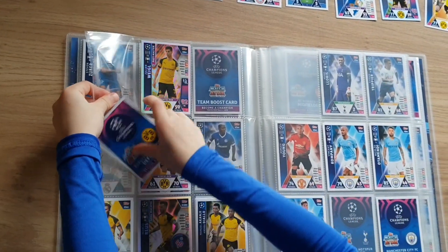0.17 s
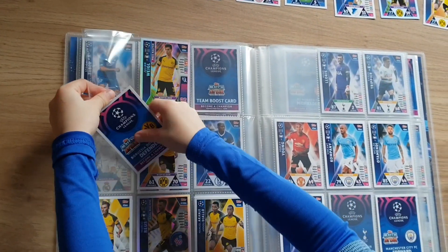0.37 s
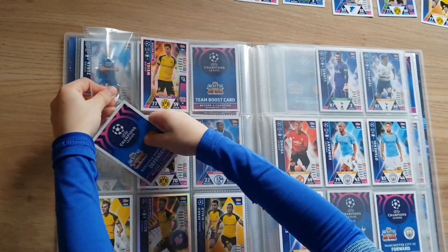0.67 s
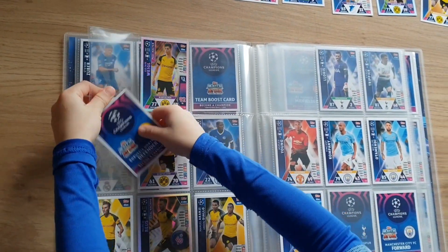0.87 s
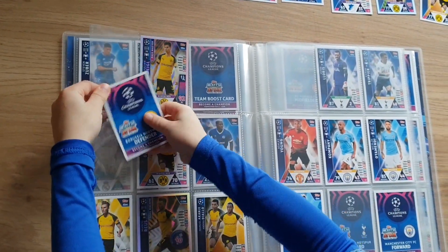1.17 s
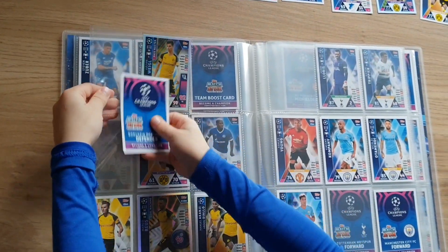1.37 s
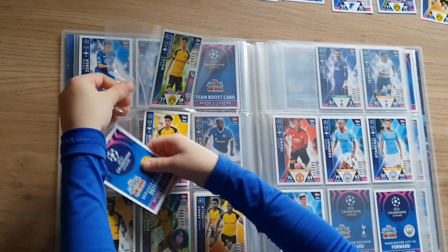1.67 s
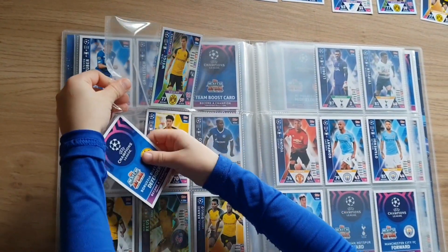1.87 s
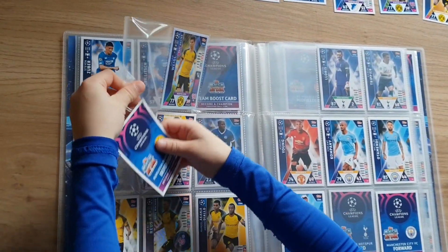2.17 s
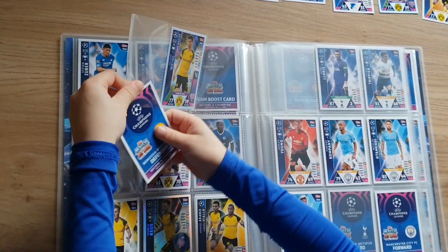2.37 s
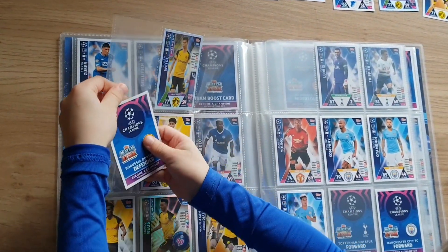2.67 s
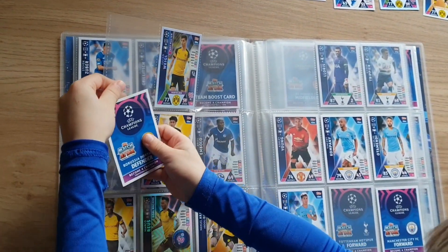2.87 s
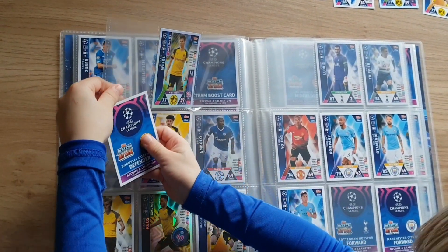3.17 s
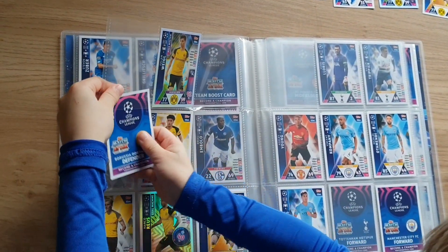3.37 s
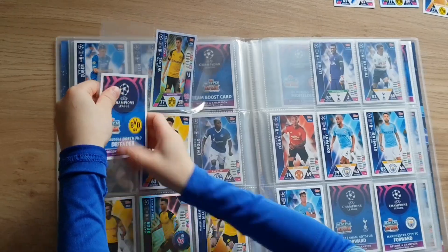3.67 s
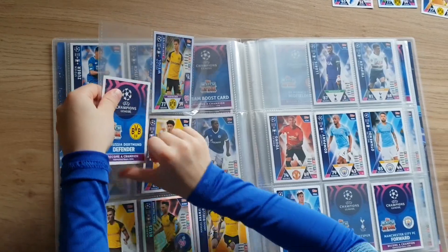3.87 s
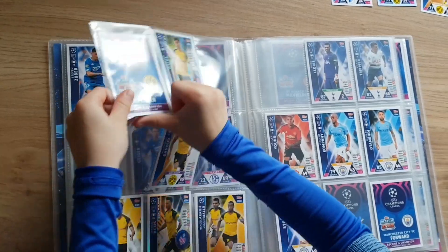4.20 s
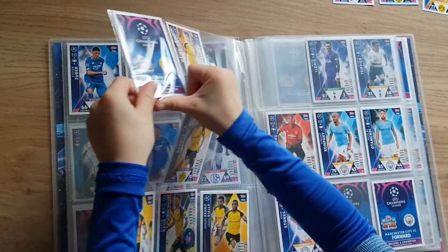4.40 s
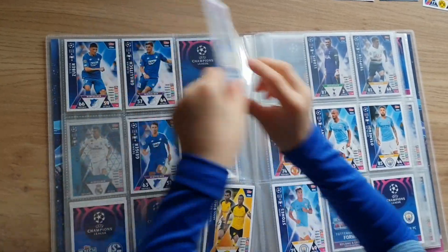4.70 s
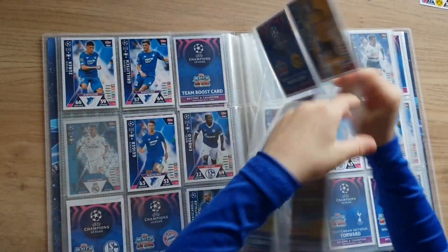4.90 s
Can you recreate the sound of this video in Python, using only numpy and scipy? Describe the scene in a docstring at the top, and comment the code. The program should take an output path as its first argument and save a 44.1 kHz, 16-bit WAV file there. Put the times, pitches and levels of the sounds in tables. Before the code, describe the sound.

Stiff clear film buckles with sharp clicks and tiny crackling tails, joined by brief hissy finger rubs and light binder taps. Activity is lively for two seconds, quiet around three, then rises to a hard snap after four and a loud crackling flurry just before five. Short room reflections, faint low rumble and hiss, near stereo pickup, louder on the left.

```python
"""A card is worked by hand into a clear plastic binder sleeve, on a wooden table in a small quiet room.
The film buckles in sharp snaps, each a click and a dying volley of clicks; between them tiny slips and
smooth hiss make it rustle, and short noise bursts knock on the binder. Dull pushes come up the stand.
A pair of microphone ports hangs above: the left one hears the page louder and a little earlier.
Band-passed forces ring cover, film and binder; shifting echoes, low rumble and hiss make the room."""
import sys
import numpy as np
from scipy import signal
from scipy.fft import rfft, irfft
from scipy.io import wavfile
from scipy.ndimage import map_coordinates

SR = 44100
rng = np.random.default_rng(int(sys.argv[2]) if len(sys.argv) > 2 else 0)


def store_wav(level_fs):
    """Save 16-bit WAV to argv[1]."""
    pcm = np.round(np.clip(np.atleast_2d(level_fs), -1, 1) * 32767)
    wavfile.write(sys.argv[1], SR, pcm.T.astype(np.int16))


N = 222352
TIME_S = np.arange(N) / SR


def amp(db):
    """dB to gain."""
    return 10 ** (np.asarray(db) / 20)


def rms_one(x):
    """Scale to rms 1."""
    return x / np.sqrt(np.mean(x ** 2) + 1e-20)


def at_hz(points, hz):
    """Read a table on a log-frequency axis."""
    table_hz, values = np.array(points).T
    return np.interp(np.log(np.maximum(hz, 1)), np.log(table_hz), values)


def zone(x, edges_hz):
    """Band-pass whose output for white noise of rms 1 has rms 1."""
    low_hz, high_hz = edges_hz
    sos = signal.butter(3, edges_hz, "band", fs=SR, output="sos")
    return signal.sosfilt(sos, x + 1e-18) * np.sqrt(SR / 2 / (high_hz - low_hz))


def drift(rate_hz):
    """Slow random wander: straight lines between random knots of spread 1."""
    knots = rng.standard_normal(400)
    return np.interp(TIME_S * rate_hz, np.arange(400), knots)


def lift(x, hz, width_hz, lift_db):
    """A resonance lifts or lowers its band: a two-pole ring is added to or taken from the sound."""
    r = np.exp(-np.pi * width_hz / SR)
    poles = [1, -2 * r * np.cos(2 * np.pi * hz / SR), r * r]
    ring = signal.lfilter(np.array([1, 0, -1]) * (1 - r * r) / 2, poles, x)
    return x + (amp(lift_db) - 1) * ring


def split_by_likeness(mid, side, likeness):
    """Left and right noise from two independent ones, alike by the given correlation."""
    alike = np.clip(likeness, 0, 1)
    common, opposed = np.sqrt(1 + alike) * mid, np.sqrt(1 - alike) * side
    return common + opposed, common - opposed


# spectrum of the quiet room: f/Hz, relative density level/dB per Hz
TONE_SPECTRUM = [(15, -24.5), (30, -9.5), (50, -9), (92, -2.5), (135, -8.5), (215, -14.5), (260, -24.5),
                 (500, -25.5), (1400, -25.5), (2200, -32), (5500, -32.5), (7500, -31.5), (9500, -32.5),
                 (15500, -35.5)]
# how far the two ports hear the same room tone: f/Hz, left-right likeness/0..1
TONE_LIKENESS = [(30, .45), (130, .7), (290, .65), (640, .27), (1400, .01)]
TONE_RMS_DB, TONE_LEFT_OVER_RIGHT_DB = -67.5, 3.0   # the rms is set before the left-right tilt


def room_tone():
    """Low rumble of the house, alike at both ports, and microphone hiss of each port's own."""
    hz = np.fft.rfftfreq(N, 1 / SR)
    mid, side = rfft(rng.standard_normal((2, N))) * amp(at_hz(TONE_SPECTRUM, hz))
    pair = irfft(np.array(split_by_likeness(mid, side, at_hz(TONE_LIKENESS, hz))), N)
    tilt = amp([[TONE_LEFT_OVER_RIGHT_DB / 2], [-TONE_LEFT_OVER_RIGHT_DB / 2]])
    return amp(TONE_RMS_DB) * rms_one(pair) * tilt


# finger strokes on the film: start t/s, length/s, relative level at start/dB, at end/dB,
# brightness/dB, weight on the page/dB
STROKES = [(-.03, 0.19, -70, -68, -8, 6), (0.155, 0.13, -59.5, -61.5, -2, 3.5),
           (.37, 0.2, -65, -73, -1.5, 4), (0.545, 0.078, -55.5, -60, -10.5, -6),
           (0.644, 0.13, -76, -70, -11, 4), (0.784, 0.1, -63, -68.5, -5, 4),
           (0.908, 0.14, -46, -66.5, 8.5, -10.5), (1.072, 0.062, -76, -68, 0, 7),
           (1.202, 0.11, -68.5, -61.5, 2.5, -0.5), (1.404, 0.1, -69, -64.5, 4, -14),
           (1.472, .13, -68, -65, 1.5, 3.5), (1.626, 0.13, -57, -65.5, 3, 1),
           (1.771, 0.12, -64.5, -78, 5.5, 6.5), (1.97, 0.062, -90, -92, -8, 13),
           (2.052, 0.12, -75, -79.5, 2, 6.5), (2.208, 0.1, -61, -58, 6, -7),
           (2.316, 0.015, -58, -57.5, -8, 0.5), (2.347, 0.23, -65, -75.5, 4.5, 1.5),
           (2.599, 0.1, -73, -65.5, 7, -5), (2.906, 0.038, -58, -73, -16, -8),
           (3.047, 0.086, -62.5, -76.5, -3, 6), (3.17, 0.049, -68, -69.5, 1, 0.5),
           (3.401, 0.134, -76.5, -67.5, 1.5, -1), (3.526, 0.15, -70, -61.5, 4.5, 4.5),
           (3.688, 0.13, -60, -63, 3, 7), (3.986, 0.075, -69.5, -60.5, 11, -3),
           (4.088, 0.14, -51.5, -64, 5.5, 1.5), (4.266, 0.097, -52.5, -73.5, 2, 4.5),
           (4.361, 0.056, -68.5, -59, 2.5, -0.5), (4.627, 0.072, -63, -55.5, 1, -7.5),
           (4.75, 0.13, -66.5, -63.5, 3, -6.5), (4.856, 0.1, -52.5, -49, 5, -1),
           (4.97, 0.031, -66, -56.5, 9.5, -1.5)]
# Zones in order here and below: cover, flap, broad crease, tight crease, fine edge, binder.
# a plain stroke, one entry per zone: relative level/dB
RUSTLE_DB = [-17, -4.5, 1, -11, 2, -12]
# one entry per zone: share of a stroke's brightness that it takes/ratio
BRIGHT_REACH = [0.46, 0, 0.018, 0.73, 1, 0.27]
# one entry per zone: share of a stroke's weight that it takes/ratio
WEIGHT_REACH = [1.6, 1.06, 0.073, 0.083, 0.28, 0.7]
STROKE_ATTACK_S, STROKE_RELEASE_S = .015, .028   # linear rise; time constant of the fall


def strokes():
    """Strength of the rubbing in each zone: a stroke sets in, swells or sinks evenly in dB, and dies away."""
    power = np.zeros((6, N))
    for start_s, length_s, start_db, end_db, bright_db, weight_db in STROKES:
        end_s = start_s + length_s
        level = amp(np.interp(TIME_S, [start_s, end_s], [start_db, end_db]))
        level = level * np.clip((TIME_S - start_s) / STROKE_ATTACK_S, 0, 1)
        level = level * np.exp(-np.maximum(TIME_S - end_s, 0) / STROKE_RELEASE_S)
        tilt_db = np.multiply(BRIGHT_REACH, bright_db) + np.multiply(WEIGHT_REACH, weight_db)
        zones_db = np.add(RUSTLE_DB, tilt_db)
        power += (amp(np.c_[zones_db]) * level) ** 2
    return np.sqrt(power)


def grains(per_s, spread_db):
    """Random clicks of uneven size and sign, coming in clumps."""
    sizes = amp(spread_db * np.minimum(rng.exponential(1, N), 4)) * rng.choice([-1, 1], N)
    clumps = amp(6 * np.clip(drift(60), -2, 2))
    return rms_one(sizes * (rng.random(N) < per_s * clumps / SR))


# neighbouring zones move in opposite directions, one entry per zone: sign
SWING = [1, -1, 1, -1, 1, -1]
SLIPS_PER_S = 2500   # before clumping


def rustle():
    """Force on each zone from one stream of tiny slips; rubbing adds smooth hiss."""
    hiss = .55 * rng.standard_normal(N)
    slips = rms_one(grains(SLIPS_PER_S, spread_db=4.5) + hiss)
    return np.c_[SWING] * slips * strokes()


# bands in which the zones sound, one row per zone: low f/Hz, high f/Hz
ZONES_HZ = [(650, 1050), (1050, 2800), (2800, 5800), (5800, 8500), (8500, 17000), (110, 650)]
# hollow knock of the binder cover: f/Hz, width/Hz, lift/dB
COVER_MODE = (853, 57, 12.3)
# ring of the binder: f/Hz, width/Hz, lift/dB
BINDER_MODE = (472, 66, 4.15)
# table and port resonances: f/Hz, width/Hz, lift/dB
TABLE_AND_PORT_MODES = [(1343, 220, 4.5), (1770, 670, 1.5), (2630, 470, -3), (4850, 820, 5.5),
                        (7370, 1200, 5), (8630, 3300, -5), (14950, 4200, -12.5)]


def colour(drive):
    """Each zone sounds its own band, cover and binder ring, then table and ports colour the sum."""
    cover, *film, binder = [zone(force, edges) for force, edges in zip(drive, ZONES_HZ)]
    sound = amp(-9.5) * lift(cover, *COVER_MODE) + sum(film) + lift(binder, *BINDER_MODE)
    for mode in TABLE_AND_PORT_MODES:
        sound = lift(sound, *mode)
    return sound


# how long the room rings: f/Hz, time to fall by 60 dB t/s
ROOM_T60 = [(500, 0.21), (1300, 0.17), (3500, 0.15), (9000, 0.14)]
# how far the ports hear the same echoes: f/Hz, left-right likeness/0..1
ROOM_LIKENESS = [(125, .7), (350, .3), (700, .05), (1400, .01)]


def echoes(count):
    """Patterns of dense echoes that die band by band, alike at both ports only in the bass."""
    t = np.arange(SR // 4) / SR
    white = rng.standard_normal((count, 2, SR // 4))
    tails = 0
    for low_hz in 80 * 2. ** np.arange(8):   # octave bands
        centre_hz = np.sqrt(2) * low_hz
        sos = signal.butter(2, [low_hz, 2 * low_hz], "band", fs=SR, output="sos")
        mid, side = np.moveaxis(signal.sosfilt(sos, white), 1, 0)
        pair = np.array(split_by_likeness(mid, side, at_hz(ROOM_LIKENESS, centre_hz)))
        tails = tails + pair * amp(-60 * t / at_hz(ROOM_T60, centre_hz))
    tails = tails * np.clip(t / .0065, 0, 1)   # the echoes swell in over the first 6.5 ms
    return tails / np.sqrt(np.sum(tails ** 2, axis=2, keepdims=True))


def room(x):
    """Hands and page keep moving, so the echo pattern fades into another every 30 ms, twelve in a cycle."""
    count = 12
    place = TIME_S / .03
    tails, out = echoes(count), 0
    for k in range(count):
        steps_away = (place - k + count / 2) % count - count / 2
        share = np.cos(np.pi / 2 * np.clip(steps_away, -1, 1))
        out = out + signal.oaconvolve((x * share)[None], tails[:, k], axes=1)[:, :N]
    return out


# film buckling: t/s, then relative level/dB of broad crease, cover knock, sheet flap and fine edge,
# then decay time of the volley/ms
SNAPS = [(0.0918, -65, -78, -57, -81, 5.8), (0.178, -38, -68, -51, -47, 2.6),
         (0.3648, -29, -91, -51.5, -49, 3.2), (0.4476, -35.5, -88, -57, -64.5, 2.6),
         (0.5478, -43.5, -70, -53, -59, 9.9), (0.5801, -40, -81, -66, -70, 2.6),
         (0.7861, -54, -57, -47, -76, 6.8), (0.8081, -46, -59.5, -44.5, -74, 4.9),
         (0.8309, -42, -75, -50.5, -69, 5.5), (0.9122, -29.5, -47, -31, -31.5, 5.9),
         (0.9452, -25.5, -52, -35.5, -29.5, 5.7), (1.0135, -49, -53, -46.5, -46, 2.1),
         (1.0235, -34.5, -61, -40.5, -44, 3.4), (1.048, -38, -54, -47.5, -60, 4.3),
         (1.0939, -42.5, -58, -47, -55, 4.7), (1.214, -51, -60, -44, -82, 3.6),
         (1.2922, -39.5, -52.5, -47.5, -48.5, 6.2), (1.3437, -55, -66.5, -61, -61, 5),
         (1.3987, -45, -61, -52, -60.5, 5.1), (1.476, -41, -63, -47, -41, 2.8),
         (1.5111, -38, -60, -44, -51.5, 12), (1.5598, -46, -54, -41, -53, 2.5),
         (1.6295, -38, -57, -56, -43, 5.5), (1.6574, -43, -47.5, -49.5, -29, 9.3),
         (1.6721, -29, -50, -41.5, -31.5, 7), (1.7908, -33, -54, -54, -69, 3.1),
         (1.7944, -36.5, -59, -42, -54, 5.2), (1.8062, -42, -57.5, -48, -55, 1.7),
         (1.8517, -36.5, -59, -57.5, -48.5, 7.5), (2.0725, -70, -61.5, -82, -75, 6.1),
         (2.1252, -42, -49, -50, -66, 4.9), (2.2242, -52, -74, -85, -60, 4.5),
         (2.2762, -41.5, -65, -71, -42, 11), (2.3513, -36, -53, -52, -47, 3.4),
         (2.4122, -38, -57, -48.5, -48, 5.1), (2.4737, -45, -60, -58, -68, 8.3),
         (2.6304, -71, -67.5, -68, -67, 12), (2.7381, -42, -54, -60, -57.5, 4),
         (2.9108, -45.5, -72, -68, -83, 7.1), (3.0458, -37.5, -58, -43.5, -59.5, 5.4),
         (3.0787, -56, -71, -53, -66, 5.5), (3.1156, -47.5, -59, -53.5, -89, 4.9),
         (3.2079, -49, -63, -57.5, -65, 4.9), (3.261, -62, -65, -54.5, -70, 6.6),
         (3.6376, -47.5, -59, -56.5, -64, 6.4), (3.6962, -45.5, -51, -43.5, -69, 6),
         (3.7264, -43, -69, -46, -53, 4.6), (3.7726, -50, -48.5, -57, -58, 11),
         (3.8152, -63, -43.5, -57, -64, 12), (3.8414, -62, -48.5, -55.5, -79, 3.3),
         (4.035, -50, -62.5, -64, -47.5, 4), (4.0907, -37, -53, -48, -59, 5.3),
         (4.1208, -34.5, -51, -42.5, -40.5, 4.8), (4.1737, -57, -53, -60, -61, 3.5),
         (4.2321, -45.5, -50, -49, -73, 5.6), (4.2832, -23.5, -49.5, -42, -37, 2.8),
         (4.3869, -63, -66, -80, -52, 12), (4.4282, -45, -50, -43, -58, 2.4),
         (4.8878, -35, -50, -41.5, -44, 10), (4.9106, -28, -60, -36.5, -49, 10),
         (4.9212, -20, -43.5, -38.5, -67, 4.9), (4.9599, -27, -51, -42, -51, 5.8),
         (5.0002, -35, -54.5, -52, -59, 3.3)]
# response to a snap of cover, flap, broad crease, tight crease, edge: level/dB
SNAP_GAIN_DB = [14, 7, 1, -5, 11.5]
VOLLEY_DB = 14   # energy of a whole volley over its level
FIRST_CLICK = 22.6   # size of the opening click of a 1 ms volley against the clicks that follow
BINDER_DB = -14   # how much of a knock on the cover reaches the whole binder


def snaps():
    """Force on each zone: a first click, then a dying volley as the fold runs on; slow folds start softly."""
    length = 1300
    drive, t = np.zeros((5, N)), np.arange(length) / SR
    draws = rng.standard_normal((len(SNAPS), 6, length))
    for (s, broad_db, knock_db, flap_db, edge_db, ms), draw in zip(SNAPS, draws):
        ms = np.clip(ms, .3, 15)
        # sizes shared by all zones leave a few strong clicks
        volley = draw[0] ** 2 * draw[1:] * np.exp(-t / ms * 1000)
        volley[:, 0] = FIRST_CLICK / ms * np.array(SWING[:5])
        volley /= np.sqrt(np.sum(volley ** 2, axis=1, keepdims=True))
        levels_db = np.add([knock_db, flap_db, broad_db, 0, edge_db], SNAP_GAIN_DB)
        levels_db[3] += (levels_db[2] + levels_db[4]) / 2   # the tight crease lies between its neighbours
        i = round(s * SR)
        drive[:, i:i + length] += (amp(VOLLEY_DB + np.c_[levels_db]) * volley)[:, :N - i]
    return np.vstack([drive, -amp(BINDER_DB) * drive[0]])


# the page knocks on the binder: t/s, relative level/dB, decay time/ms
THUMPS = [(0.199, -56, 7.7), (0.788, -58, 6.4), (0.911, -46.5, 11), (1.021, -65, 6.1), (1.341, -55, 4.6),
          (1.629, -58, 7.4), (1.795, -53.5, 4.3), (1.852, -51.5, 5.4), (2.126, -53, 6.6),
          (2.348, -55.5, 3.4), (2.412, -58, 3.7), (3.045, -62, 6.2), (3.549, -60, 5), (3.566, -49, 4.3),
          (3.609, -52, 4.6), (3.707, -58, 5), (3.825, -63, 5), (4.095, -55, 4.6), (4.138, -61, 5),
          (4.279, -41, 7.2), (4.427, -46, 6.5), (4.657, -54.5, 7.6), (4.709, -64, 5), (4.887, -47.5, 6.4),
          (4.921, -36.5, 3.1), (4.944, -46.5, 6.6)]
THUMP_GAIN_DB = 19   # energy of a knock over its level


def thumps():
    """Force on the binder alone: short dying bursts of noise."""
    length = 2000
    drive, t = np.zeros((6, N)), np.arange(length) / SR
    for (s, level_db, ms), draw in zip(THUMPS, rng.standard_normal((len(THUMPS), length))):
        burst = draw * np.exp(-t / np.clip(ms, .3, 20) * 1000)
        burst /= np.sqrt(np.sum(burst ** 2))
        i = round(s * SR)
        drive[5, i:i + length] += amp(level_db + THUMP_GAIN_DB) * burst
    return drive


# dull pushes carried up the stand: t/s, level before the left-right split/dB
BUMPS = [(1.686, -55), (1.83, -61), (2.002, -55), (4.928, -65)]
BUMP_HZ, BUMP_LENGTH_S = 42.2, .08


def bumps():
    """Each push is a short low swing that swells and sinks, stronger at the left port."""
    out, t = np.zeros(N), np.arange(SR // 10) / SR
    swell = np.sin(np.pi * np.minimum(t / BUMP_LENGTH_S, 1)) ** 2
    for s, level_db in BUMPS:
        i = round(s * SR)
        out[i:i + len(t)] += amp(level_db) * np.sin(2 * np.pi * BUMP_HZ * t) * swell
    return out * amp([[3.0], [-4.0]])


# the hands move across the page: t/s, left over right level/dB (the mean below is taken off)
PLACE = [(0.0, 7), (1.88, 6), (2.02, -4), (2.08, 6.5), (2.75, 7.5), (2.79, 4.5), (4.11, 6.5), (5.04, 6.5)]
# the body shades the right port: f/Hz, left over right level/dB
LEFT_OVER_RIGHT = [(100, 3.5), (1000, 4), (4000, 6), (7000, 4), (9000, 3), (15000, 3.5)]
# the body delays the right port: f/Hz, phase lead of the left/rad
LEFT_LEADS = [(100, .2), (500, .9), (900, 1.4), (2000, 1.7), (2600, 1.2), (3800, 3.0), (6000, 4.4),
              (7500, 6.1), (9500, 6.4), (15000, 6.5)]
MEAN_PLACE_DB, ROOM_DB = 5.5, -2
LAG_WANDER = 1   # samples per unit of drift


def at_ports(sleeve):
    """Direct sound and echoes at the two ports, each taking half of the left-right differences."""
    # the sounding spot moves about the page, so the right port's lag wanders
    late = np.arange(N) - LAG_WANDER * np.clip(drift(7.6), -2, 2)
    direct = np.array([sleeve, map_coordinates(sleeve, [late], order=3)])
    halves = np.c_[[.5, -.5]]
    place_db = np.interp(TIME_S, *np.transpose(PLACE)) - MEAN_PLACE_DB
    direct = direct * amp(halves * place_db)
    hz = np.fft.rfftfreq(N, 1 / SR)
    ports = amp(halves * at_hz(LEFT_OVER_RIGHT, hz)) * np.exp(1j * halves * at_hz(LEFT_LEADS, hz))
    return irfft(rfft(direct + amp(ROOM_DB) * room(sleeve)) * ports, N)


def scene():
    """Sleeve heard directly and by way of the room, with the room tone and the pushes on the stand."""
    sleeve = colour(snaps() + rustle() + thumps())
    return at_ports(sleeve) + room_tone() + bumps()


def record(dry):
    """The top is cut steeply by an elliptic low-pass."""
    cutoff_hz = 15750
    return signal.sosfilt(signal.ellip(12, .5, 70, cutoff_hz, fs=SR, output="sos"), dry)


dry = scene()
out = record(dry)
store_wav(out)
```